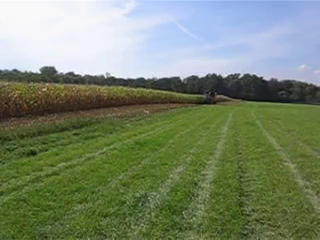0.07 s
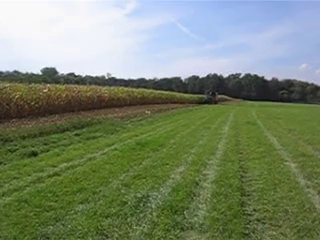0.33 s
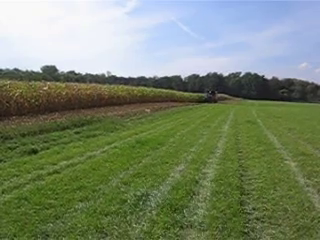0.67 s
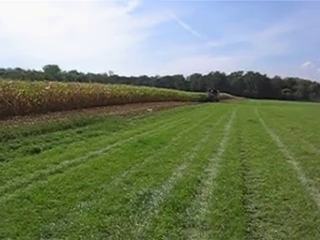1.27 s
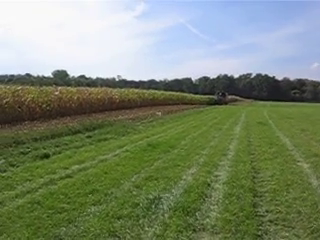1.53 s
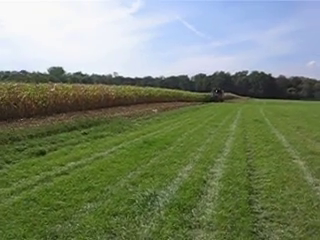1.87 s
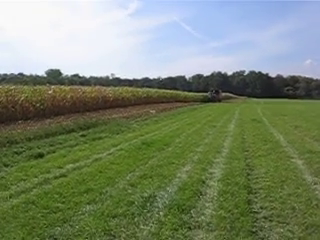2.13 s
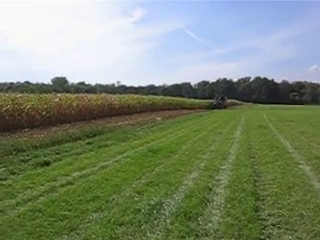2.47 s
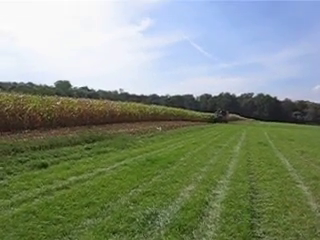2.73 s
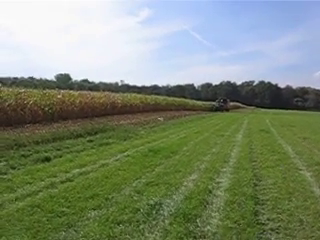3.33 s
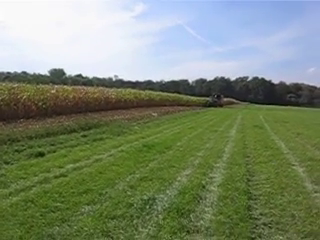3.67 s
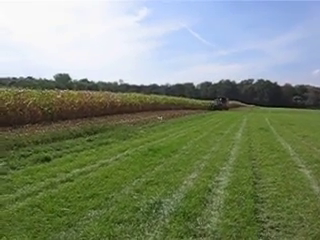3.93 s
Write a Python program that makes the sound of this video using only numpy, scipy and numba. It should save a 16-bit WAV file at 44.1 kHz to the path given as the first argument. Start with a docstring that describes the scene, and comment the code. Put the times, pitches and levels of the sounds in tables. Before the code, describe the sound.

Far off in a field, a tractor engine and harvester hum evenly, the hiss of chopped maize swelling past the middle. Nearby, a few finger bumps and rubs hit the microphone while a small bird chirps in brief high bursts.

```python
"""A tractor pulls a forage harvester through maize at steady speed, far off across a field.
Its six cylinders drone, the harvester's rotors hum and its chopper hisses with the crop;
moving air makes it all waver. Close by, fingers knock and rub on a small camera,
and a small bird ticks out short high phrases."""
import sys
import numpy as np
from scipy import signal
from scipy.fft import rfft, irfft
from scipy.io import wavfile
from numba import njit

SR = 44100
rng = np.random.default_rng(int(sys.argv[2]) if len(sys.argv) > 2 else 0)


def pcm_store(signal):
    """Save signal as 16-bit PCM."""
    levels = np.round(np.clip(np.atleast_2d(signal), -1, 1) * 32767)
    wavfile.write(sys.argv[1], SR, levels.astype(np.int16).T)


N = 176400


def undb(db):
    return 10 ** (np.asarray(db) / 20)


def times():
    return np.arange(N) / SR


def curve(rows):
    """Gain along rows of time_s, level_db."""
    return undb(np.interp(times(), *np.array(rows).T))


def walk(rate_hz):
    """Smooth random drift, unit spread."""
    hz = np.fft.rfftfreq(2 * N, 1 / SR)
    drift = irfft(rfft(rng.standard_normal(2 * N)) * np.exp(-.5 * (hz / rate_hz) ** 2))[:N]
    return (drift - drift.mean()) / drift.std()


def noise(spectrum):
    """Unit noise shaped by rows of freq_hz, relative_db; rolls off above the last."""
    hz, db = np.array(spectrum, float).T
    bin_hz = np.fft.rfftfreq(N, 1 / SR) + 1
    gain = undb(np.interp(np.log(bin_hz), np.log(hz), db)) / np.maximum(1, bin_hz / hz[-1]) ** 2
    shaped = irfft(rfft(rng.standard_normal(N)) * gain, N)
    return shaped / shaped.std()


def air(x, fade_db, flicker_db):
    """Moving air: all octaves fade together slowly, and each flickers alone."""
    octave = np.clip(np.log2((np.fft.rfftfreq(N, 1 / SR) + 1) / 25), 0, 8)
    spectrum = rfft(x)
    bands = (irfft(spectrum * np.maximum(0, 1 - abs(octave - k)), N) for k in range(9))
    return sum(band * undb(flicker_db * walk(17)) for band in bands) * undb(fade_db * walk(8.2))


def turns(hz, wander):
    """Turns of a shaft whose speed wanders by a small fraction."""
    return np.cumsum(hz * (1 + wander * walk(4.95))) / SR + rng.random()


def tone(phase_turns, fade_db):
    """Sine wavering about unit rms."""
    return np.sqrt(2) * np.sin(2 * np.pi * (phase_turns + rng.random())) * undb(fade_db * walk(6))


def tractor(cycle_hz=18.0, rasp_decay_firings=.65):
    """Four-stroke drone, bright rasp after each of six firings, low roar of exhaust and machinery."""
    # engine harmonics: cycle_multiple, level_db
    orders = [(2, -36), (3, -35), (5, -40.5), (6, -22.5), (9, -39), (12, -34), (13, -43), (15, -48),
              (18, -40), (20, -44.5), (21, -42.5), (24, -53), (27, -52.5), (28, -54.5), (34, -54),
              (40, -52)]
    # noise spectra: freq_hz, relative_db
    rasp_spectrum = [(2000, -16.5), (2850, -23.5), (3150, -8), (3450, -9), (3780, -1), (4080, -14),
                     (4400, -3.5), (4650, -16.5), (4950, -11.5), (5400, -18), (6200, -40.5)]
    roar_spectrum = [(15, -3), (40, -5), (75, -8.5), (100, 2.5), (130, -3.5), (170, 1.5), (235, 2),
                     (320, -5), (420, -14), (540, -15), (700, -12), (850, -12), (1050, -18), (1500, -21.5),
                     (3000, -30)]
    # envelopes: time_s, level_db
    rasp_level = [(0, -45.5), (1.2, -46.5), (2.0, -43), (2.42, -34.5), (2.8, -39), (3.06, -35),
                  (3.3, -37.5), (3.6, -38.5), (4, -37.5)]
    roar_level = [(0, -26), (1, -27), (2, -25.5), (2.6, -25), (3.2, -25.5), (4, -26)]
    cycle = turns(cycle_hz, wander=.0016)
    drone = sum(undb(db) * tone(order * cycle, fade_db=.8) for order, db in orders)
    firing_phase = 6 * cycle % 1
    bursts = np.exp(-firing_phase / rasp_decay_firings) * undb(2.5 * walk(45))
    rasp = noise(rasp_spectrum) * bursts / np.sqrt(np.mean(bursts ** 2)) * curve(rasp_level)
    roar = curve(roar_level) * air(noise(roar_spectrum), fade_db=.5, flicker_db=1.67)
    return drone + rasp + roar


def harvester(knife_hz=166.9):
    """Knives and rotors hum; the machine rushes, and hisses more as thicker crop goes through."""
    # knife hum as the air carries it: time_s, relative_db
    knife_level = [(0.05, -19.5), (0.09, -25), (0.16, -29), (0.27, -23.5), (0.38, -27.5), (0.73, -22.5),
                   (0.75, -27), (1.26, -22), (1.37, -37), (1.41, -19), (1.48, -24), (1.56, -32),
                   (1.62, -23.5), (2.28, -23.5), (2.32, -28.5), (2.45, -19.5), (2.59, -30), (2.63, -21),
                   (2.84, -28), (2.88, -23), (3.49, -22.5), (3.61, -34), (3.69, -19), (3.78, -28),
                   (3.84, -18.5), (4.0, -31)]
    # other shafts and fans: pitch_hz, level_db, fade_db, wander_fraction
    rotors = [(49.1, -37.5, 3.5, 0.0032), (69.6, -36, 1, .003), (289.6, -30, 2.5, .004),
              (574, -50.5, 3.5, 0.0014), (666, -45.5, 3, 0.0063), (1297, -55.5, 3, 0.0022)]
    # spectra of machine rush and of chopped, blown crop: freq_hz, relative_db
    rush_spectrum = [(700, -12.5), (1200, 0.5), (1750, 3), (2050, -2.5), (2550, 4), (2900, 0.5),
                     (3200, 3.5), (3800, -3), (4150, -4), (4400, -3.5), (4900, -5.5), (5400, -4),
                     (6200, -33.5)]
    crop_spectrum = [(1000, -12.5), (1500, -15), (1720, 9), (2000, -1.5), (2350, 8), (2850, -5.5),
                     (3200, 8.5), (3500, -7.5), (3800, -1.5), (4150, -4.5), (4450, -3), (5000, -10.5),
                     (6000, -24.5)]
    # envelopes: time_s, level_db
    rush_level = [(0, -33.5), (.15, -35.5), (.25, -38), (.45, -36), (.6, -34.5), (.95, -37), (1.45, -37),
                  (1.8, -38), (2.5, -39), (3.1, -38.5), (4, -39)]
    crop_level = [(0, -58.5), (1.7, -46.5), (2.05, -39.5), (2.4, -33.5), (2.58, -33.5), (2.72, -37.5),
                  (3.0, -40), (3.4, -47), (3.6, -46.5), (4, -48.5)]
    knives = undb(.5) * curve(knife_level) * tone(turns(knife_hz, wander=.005), fade_db=.74)
    hum = sum(undb(db) * tone(turns(hz, wander), fade_db) for hz, db, fade_db, wander in rotors)
    hiss = noise(rush_spectrum) * curve(rush_level) + noise(crop_spectrum) * curve(crop_level)
    return knives + hum + air(hiss, fade_db=.3, flicker_db=.8)


def contact(x, centre_hz, reach_octaves=1.04):
    """Band-pass: a soft fingertip drives the low modes, a nail the high ones."""
    edges_hz = centre_hz * 2 ** np.array([-reach_octaves, reach_octaves])
    return signal.lfilter(*signal.butter(1, edges_hz, "bandpass", fs=SR), x)


def handling(crack_s=.0012, onset_s=.005, grain_db=7.5, scratch_db=7):
    """Finger knocks and gritty rubs ring the camera's plastic case."""
    # case modes: freq_hz, t60_s, relative_db
    modes = [(418, 0.04, -16.5), (680, 0.009, -4.5), (1030, 0.019, -6), (1740, 0.0092, -8),
             (2180, 0.0083, -5.5), (2920, 0.011, -7), (4800, 0.0025, -3)]
    # finger strikes: start_s, onset_db, centre_hz
    knocks = [(.2228, -22.5, 790), (1.561, -24.5, 1050), (1.5742, -25, 1000), (2.7072, -14, 810),
              (2.777, -27, 1300), (2.834, -21, 5000), (2.8388, -21.5, 2500), (3.4898, -14.5, 2000),
              (3.5243, -20.5, 2190), (3.533, -24, 1600), (3.549, -33.5, 1500)]
    # finger slides: middle_s, sigma_s, level_db, centre_hz
    rubs = [(0.244, 0.0054, -38, 300), (1.53, 0.012, -32, 3000), (1.563, 0.011, -28, 1000),
            (2.75, 0.021, -33, 400), (2.821, .014, -23.5, 5000), (3.524, .004, -29, 4000),
            (3.567, 0.037, -28, 520)]
    t, out = times(), np.zeros(N)
    age_s = t[:SR // 10]
    ring = sum(undb(db - 60 * age_s / t60_s) * np.sin(2 * np.pi * hz * age_s) for hz, t60_s, db in modes)
    for start_s, db, centre_hz in knocks:
        crack = rng.standard_normal(len(age_s)) * np.exp(-age_s / crack_s)
        knock = contact(ring + crack, centre_hz)
        i = int(start_s * SR)
        out[i:i + len(knock)] -= undb(db) * knock / knock[:int(onset_s * SR)].std()
    for middle_s, sigma_s, db, centre_hz in rubs:
        grit = rng.standard_normal(N) * undb(grain_db * np.minimum(rng.exponential(size=N), 5))
        rung = signal.fftconvolve(grit, ring)[:N]
        rub = contact(rung / rung.std() + undb(scratch_db) * grit / grit.std(), centre_hz)
        out += undb(db) * rub / rub.std() * np.exp(-.5 * ((t - middle_s) / sigma_s) ** 2)
    return out


def bird(half_note_s=.011, arch_hz=330, top_lead_s=.0038):
    """Brief whistles that arch up and drop away."""
    # notes: middle_s, top_hz, peak_db
    chirps = [(1.287, 4980, -35), (1.323, 5070, -32), (1.718, 4920, -43), (1.748, 5060, -36),
              (1.786, 5090, -33.5), (2.317, 5000, -33.5), (2.353, 5120, -34), (2.993, 4860, -35.5),
              (3.023, 5020, -31.5), (3.059, 5090, -31.5), (3.642, 4920, -36), (3.675, 5070, -33.5),
              (3.712, 5060, -30)]
    t, out = times(), np.zeros(N)
    for middle_s, top_hz, db in chirps:
        on = abs(t - middle_s) < half_note_s
        position = (t[on] - middle_s) / half_note_s
        pitch_hz = top_hz - arch_hz * (position + top_lead_s / half_note_s) ** 2
        out[on] += undb(db) * np.cos(np.pi * position / 2) * np.sin(2 * np.pi * np.cumsum(pitch_hz) / SR)
    return out


def scene(start_s=.0355):
    """Mono mix, silent before start_s."""
    return (tractor() + harvester() + handling() + bird())[None] * (times() >= start_s)


@njit
def follow(size, fall):
    """Peak follower: jumps up, sinks slowly."""
    out, peak = np.empty(len(size)), 0.
    for i in range(len(size)):
        out[i] = peak
        peak = max(size[i], peak * fall)
    return out


def limiter(x, threshold_db=-9, attack_s=.003, release_s=.03, ceiling=.47):
    """Ducks just after sharp peaks and rounds off the tips."""
    treble = signal.lfilter(*signal.butter(2, 700, "highpass", fs=SR), x)
    peak = follow(np.maximum(abs(x), undb(-2) * abs(treble)), np.exp(-1 / (release_s * SR)))
    excess = np.maximum(0, peak / undb(threshold_db) - 1)
    slew = 1 / (attack_s * SR)
    held = x / (1 + signal.lfilter([slew], [1, slew - 1], excess))
    return held / (1 + (held / ceiling) ** 6) ** (1 / 6)


def record(dry):
    """The camera limits, then samples at quarter rate: treble is cut, a trace of it mirrored upward."""
    narrow = signal.sosfilt(signal.ellip(10, .2, 70, 5400, fs=SR, output="sos"), limiter(dry[0]))
    sampled = 4 * narrow * (np.arange(N) % 4 == 0)
    dull = signal.sosfilt(signal.butter(14, 5200, fs=SR, output="sos"), sampled)
    return signal.sosfilt(signal.ellip(10, .2, 80, 6080, fs=SR, output="sos"), dull)[None]


dry = scene()
out = record(dry)
pcm_store(out)
```